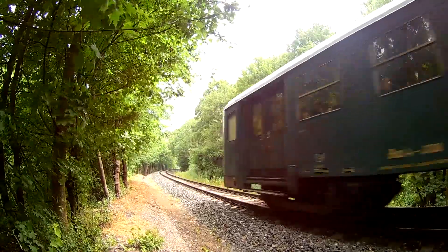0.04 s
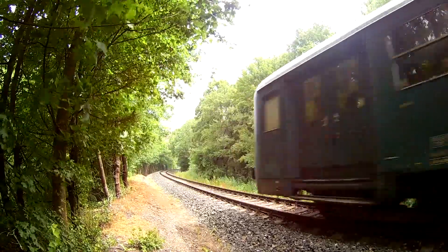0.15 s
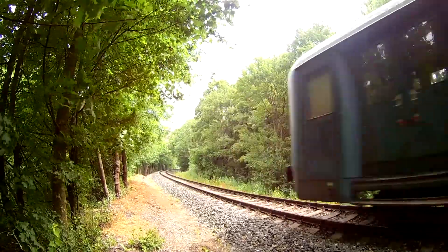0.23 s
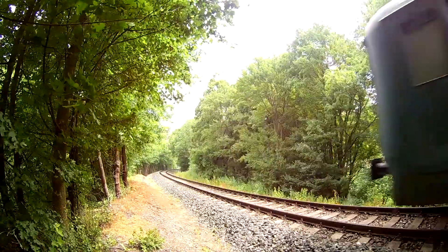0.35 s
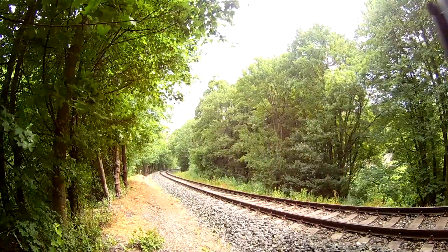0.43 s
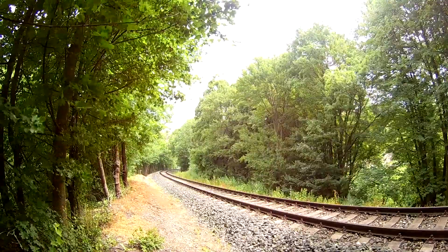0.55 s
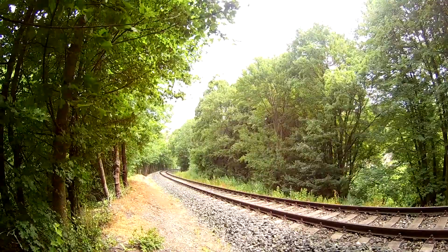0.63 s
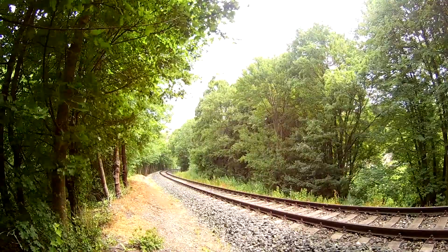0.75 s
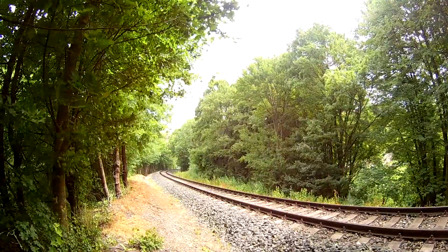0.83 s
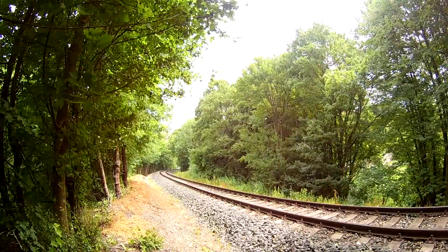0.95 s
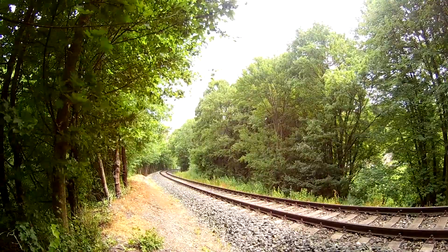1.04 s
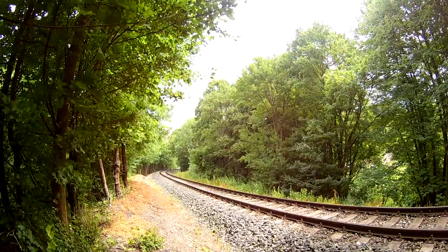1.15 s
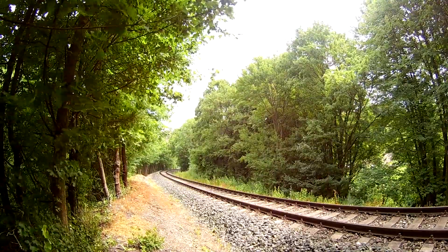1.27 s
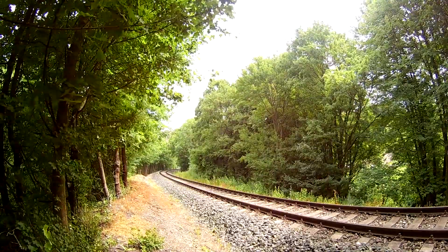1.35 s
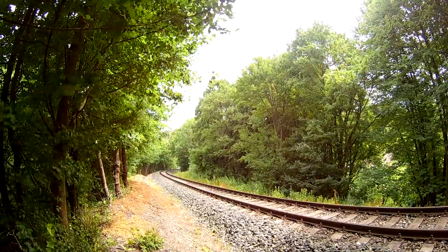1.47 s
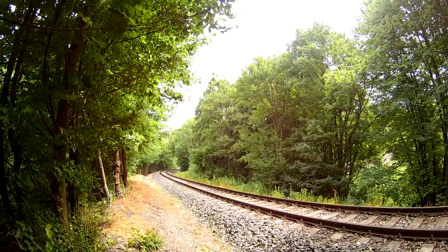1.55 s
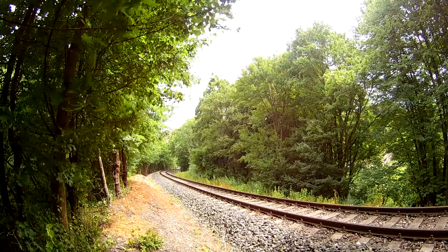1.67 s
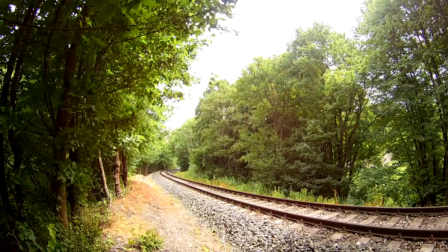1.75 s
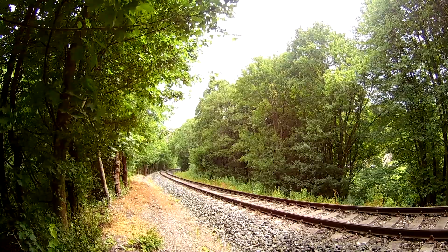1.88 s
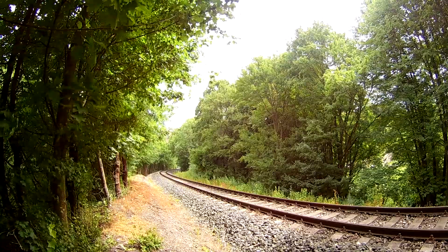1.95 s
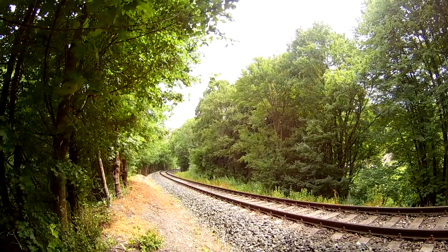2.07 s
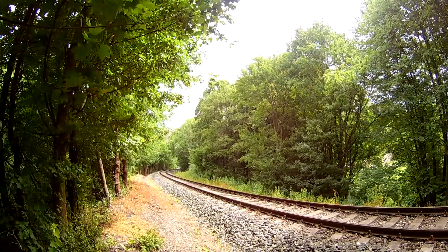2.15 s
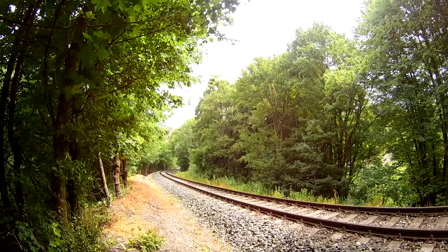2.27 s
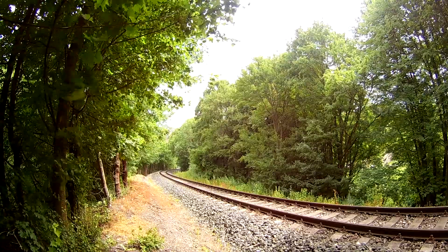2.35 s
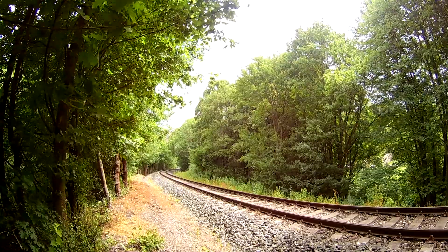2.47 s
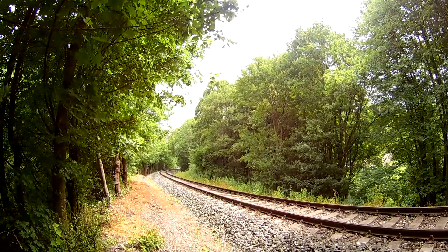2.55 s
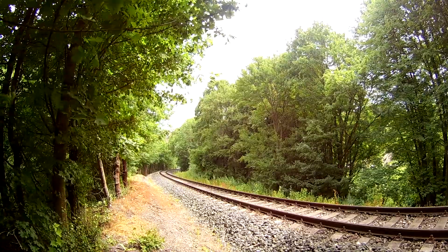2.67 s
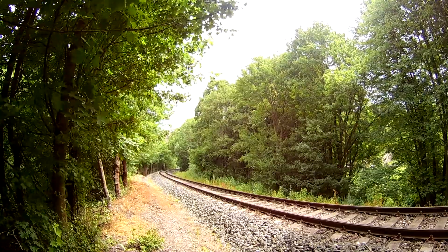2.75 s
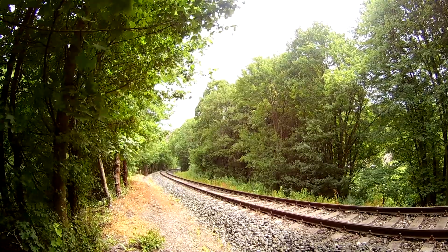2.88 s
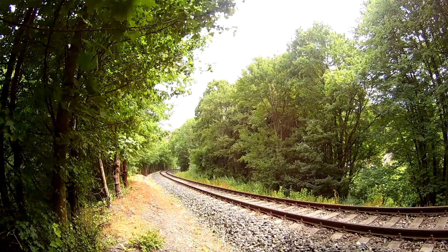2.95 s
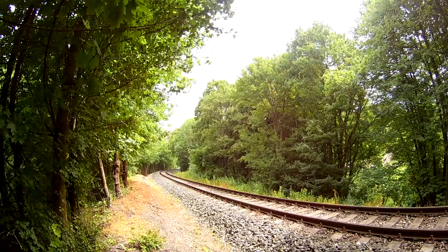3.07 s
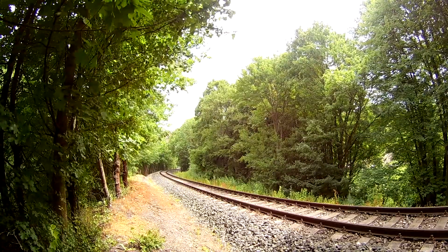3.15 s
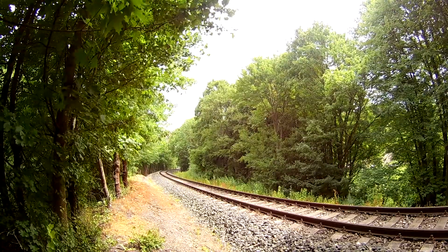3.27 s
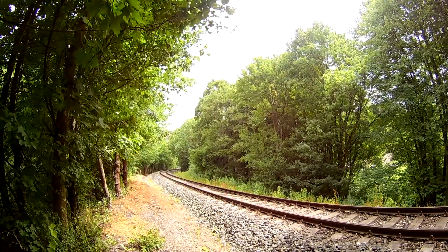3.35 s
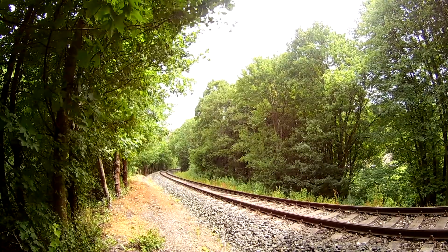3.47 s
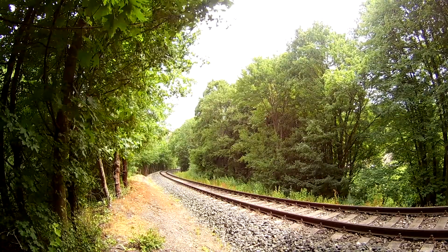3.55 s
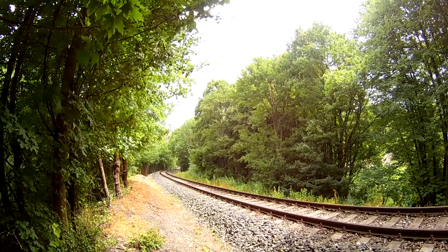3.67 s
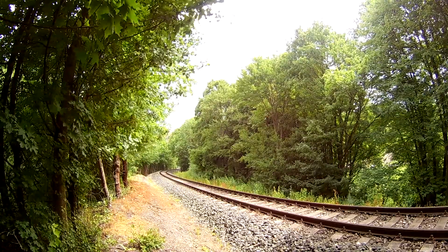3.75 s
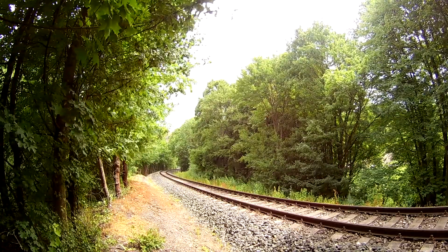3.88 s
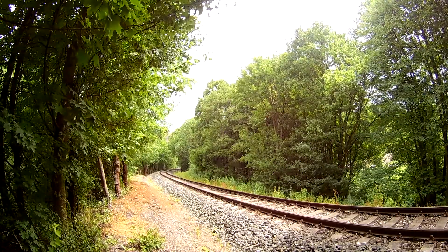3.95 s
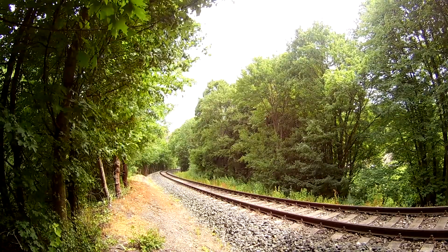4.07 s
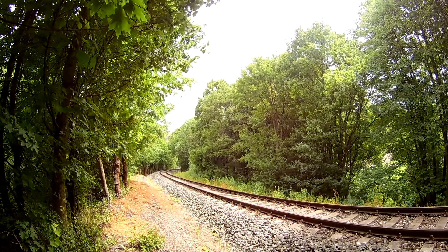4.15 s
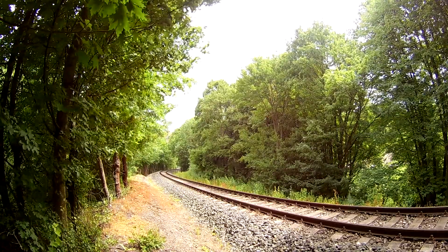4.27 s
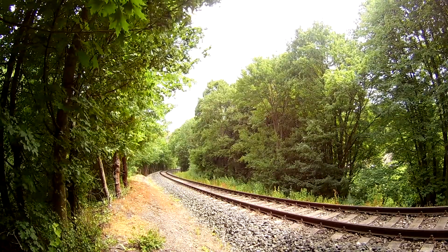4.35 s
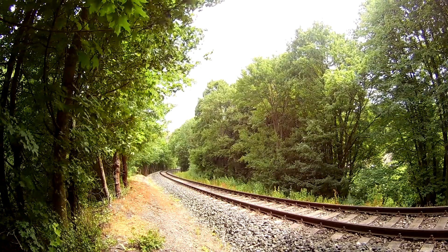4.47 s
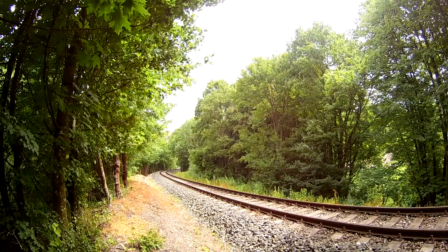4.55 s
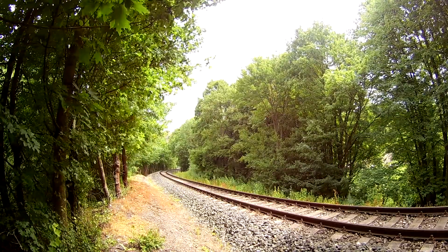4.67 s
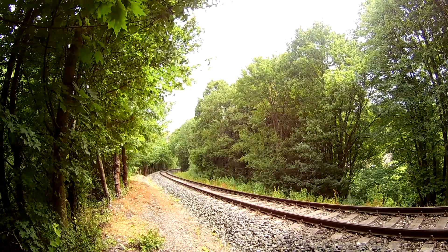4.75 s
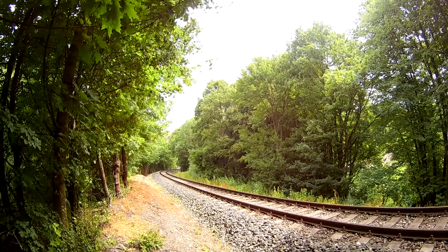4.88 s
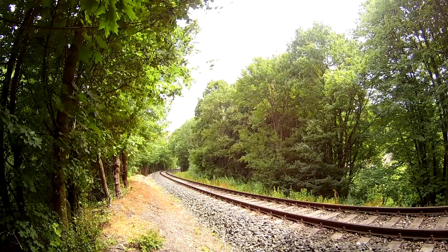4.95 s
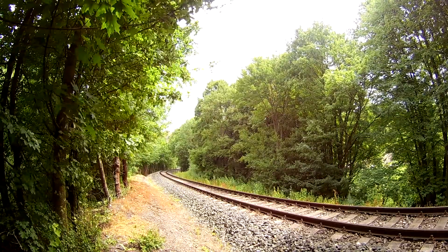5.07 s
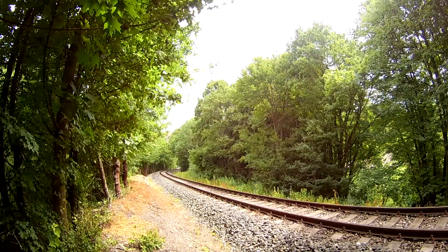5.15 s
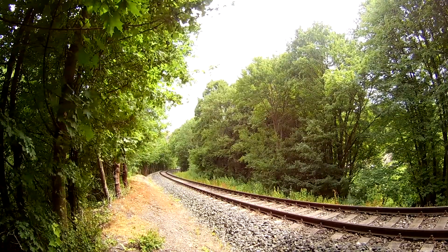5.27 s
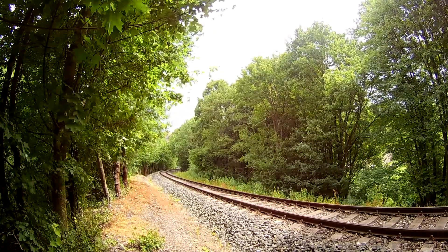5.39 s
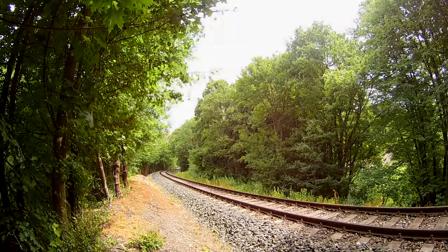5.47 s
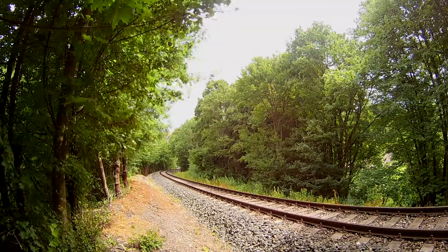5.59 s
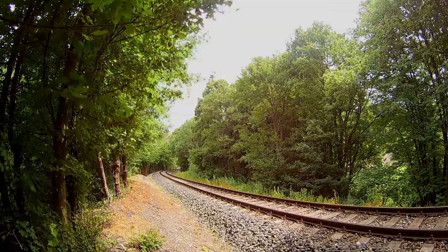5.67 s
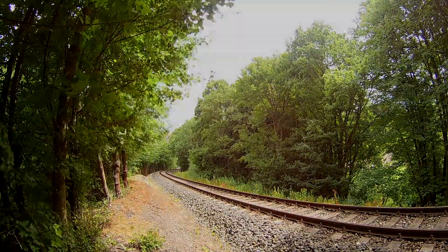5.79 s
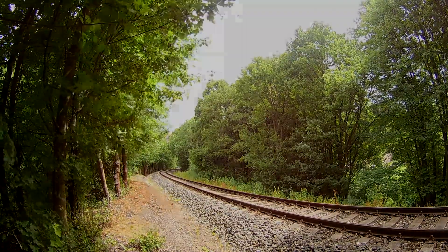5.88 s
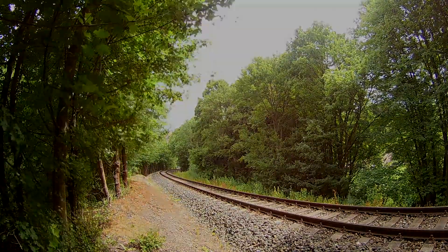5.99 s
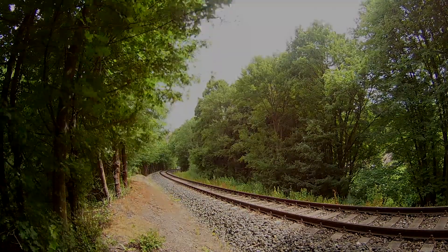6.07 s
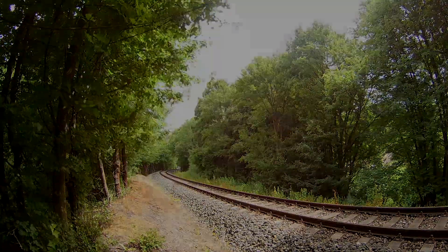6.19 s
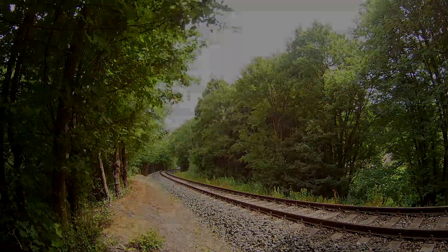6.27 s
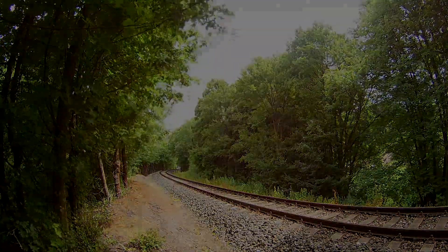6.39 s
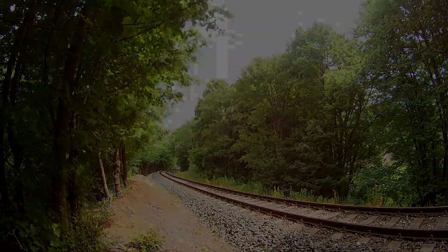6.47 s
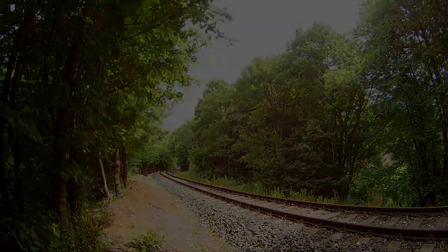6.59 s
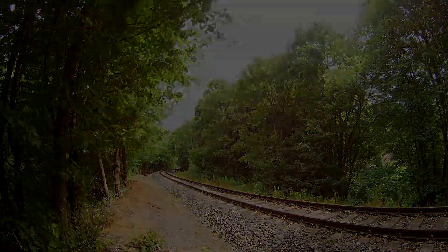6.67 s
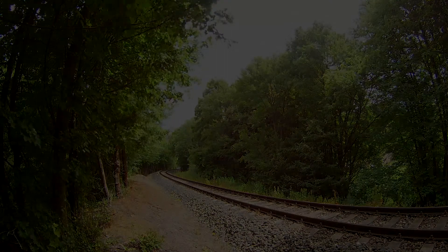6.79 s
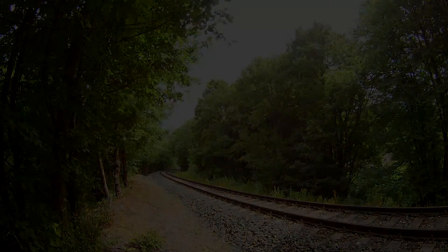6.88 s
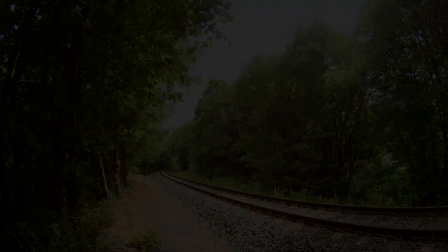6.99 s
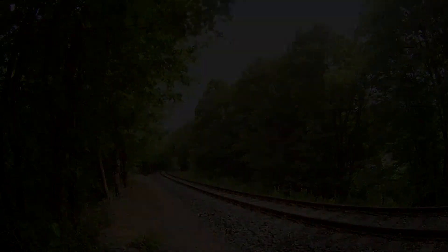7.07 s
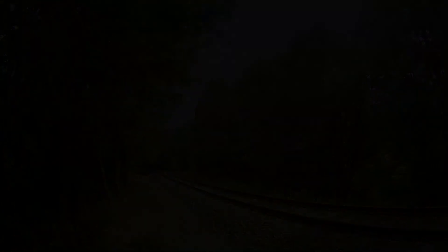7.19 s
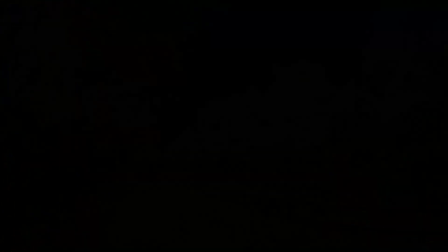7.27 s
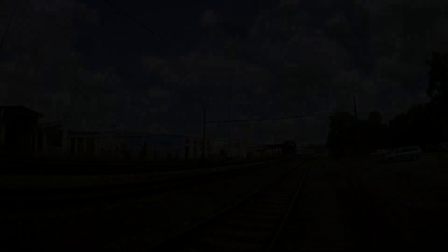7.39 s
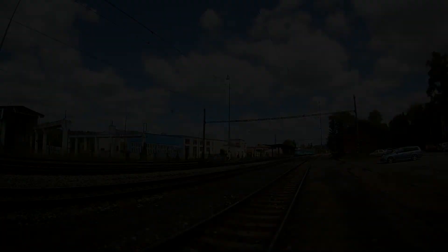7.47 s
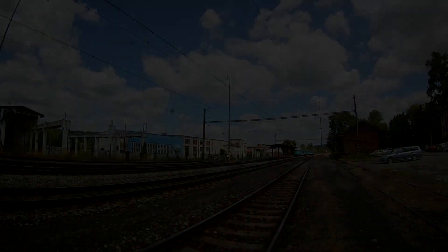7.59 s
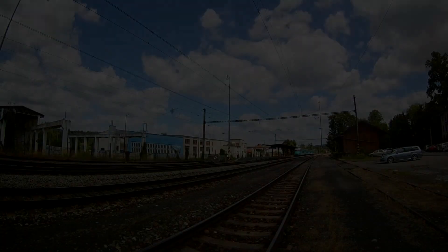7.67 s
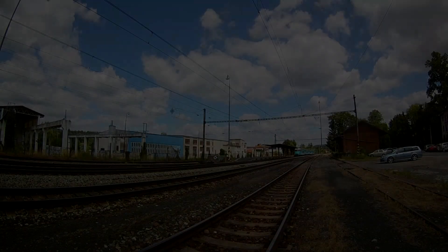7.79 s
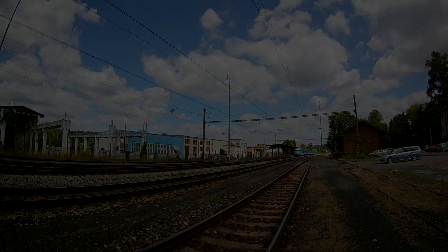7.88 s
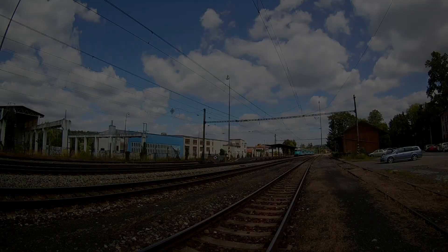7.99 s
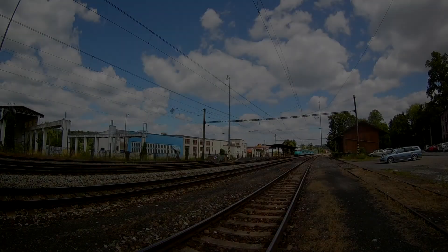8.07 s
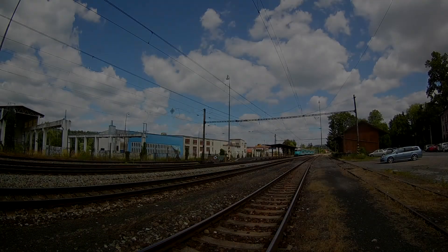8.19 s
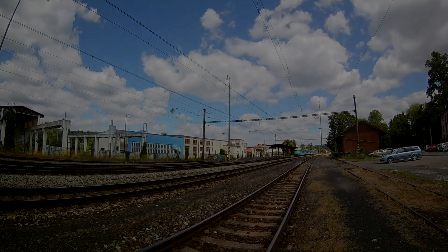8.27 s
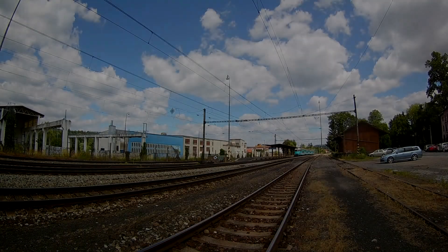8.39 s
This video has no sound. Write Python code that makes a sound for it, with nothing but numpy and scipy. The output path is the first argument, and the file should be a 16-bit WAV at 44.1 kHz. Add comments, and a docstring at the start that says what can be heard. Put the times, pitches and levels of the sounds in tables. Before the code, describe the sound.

Loud low jolts and wheel clatter as a train's tail passes, rolling away into a ringing rail murmur, fading to silence, then faint gusty hum.

```python
"""Beside a wooded railway curve, the last coach of a diesel train rushes past close by and rolls away.
Random tiny blows ring the rails, the coach body and two singing wheel modes; jolts are low sine tones.
The engine drones on wavering harmonics far ahead, and filtered noise makes the slipstream and gusts.
The sound fades out, then fades in on gusts of wind and a dull hum beside another track."""
import sys
import numpy as np
from scipy import signal
from scipy.fft import rfft, irfft
from scipy.io import wavfile
from scipy.ndimage import uniform_filter1d

SR = 44100
rng = np.random.default_rng(int(sys.argv[2]) if len(sys.argv) > 2 else 0)


def persist_wave(psi):
    """Save psi, clipped to +-1, as 16-bit WAV."""
    counts = np.round(np.clip(psi, -1, 1) * 32767).astype(np.int16)
    wavfile.write(sys.argv[1], SR, np.atleast_2d(counts).T)


N = 372204
TIME = np.arange(N) / SR  # s
FREQ = np.maximum(np.fft.rfftfreq(N, 1 / SR), 1)  # Hz, kept above zero for the logarithms
# silence between the two places: start_s, end_s
PAUSE = (7.195, 7.265)


def undb(db):
    """Turn decibels into gain."""
    return 10 ** (np.asarray(db) / 20)


def curves(table):
    """Join the points of each table column into one value a sample."""
    s, *columns = np.transpose(table)
    return [np.interp(TIME, s, column) for column in columns]


def unit(x):
    """Scale to an average strength (rms) of 1."""
    return x / np.sqrt(np.mean(x ** 2))


def shape(x, gain):
    """Filter a sound by one gain for each frequency."""
    return irfft(rfft(x) * gain, N)


def noise():
    """White noise, equally strong at all pitches."""
    return rng.standard_normal(N)


def colour(points):
    """Gain for each frequency from a pitch and level table, falling away outside it."""
    hz, db = np.transpose(points)
    inside = undb(np.interp(np.log(FREQ), np.log(hz), db))
    low_end = np.minimum(FREQ / hz[0], 1) ** 2
    high_end = np.minimum(hz[-1] / FREQ, 1) ** 2
    return inside * low_end * high_end


def bell(hz, width_hz):
    """Resonance curve, 1 at its centre."""
    return 1 / (1 + (2 * (FREQ - hz) / width_hz) ** 2)


def walk(rate_hz):
    """Smooth random wandering with an rms of 1; a higher rate wanders faster."""
    return unit(shape(noise(), np.exp(-(FREQ / rate_hz) ** 2)))


def swell(at_s, spread_s):
    """A smooth bump in time, 1 at its top."""
    return np.exp(-.5 * ((TIME - at_s) / spread_s) ** 2)


def impacts(rate, spread_db):
    """Dense tiny blows of uneven size, about rate of them a second."""
    hit = rng.random(N) < rate / SR
    size = noise() * undb(spread_db * noise())
    return unit(hit * size)


def rattling(gain, rate, spread_db, flutter_db, flutter_hz):
    """Surface roughness strikes a structure; each octave flutters on its own."""
    spectrum = rfft(impacts(rate, spread_db)) * gain
    octave = np.clip(np.log2(FREQ / 250), 0, 4)
    out = 0
    for k in range(5):
        overlap = np.maximum(1 - abs(octave - k), 0)
        band = irfft(spectrum * overlap, N)
        out = out + band * undb(flutter_db * walk(flutter_hz))
    return unit(out)


# the last bogie: moment of passing (s), speed (m/s), distance of the track (m)
PASS_S, SPEED_M_S, TRACK_M = 0.16, 14, 2.15


def receding(level_db, spread_db, loss_db_per_m):
    """Gain as the train goes: level at the pass, loss per tenfold distance, loss per metre of woods."""
    metres = np.hypot(TRACK_M, SPEED_M_S * (TIME - PASS_S))
    spreading_db = spread_db * np.log10(metres / TRACK_M)
    woods_db = loss_db_per_m * (metres - TRACK_M)
    return undb(level_db - spreading_db - woods_db)


# the wheels rub sideways in the curve:
# middle_s, spread_s, rolling_lift_db, low_mode_lift_db, high_mode_lift_db
WHEEL_RUBS = [(1.45, 0.27, 1, -6, 6), (2.66, 0.28, 1.1, 5.5, 6.5), (3.45, 0.21, -0.5, 7.5, 9.5),
              (4.953, 0.14, 1.8, 3, -2)]


def rubbing():
    """Gains by which sideways rubs lift or lower the rolling, the low mode and the high mode."""
    return undb(sum(np.outer(lifts_db, swell(at, spread)) for at, spread, *lifts_db in WHEEL_RUBS))


# resonances that lift the rolling sound: pitch_hz, width_hz, lift_db
WHEEL_RESONANCES = [(405, 35, 2), (480, 110, 0.5), (548, 25, -0.5), (650, 30, -2.5), (707, 45, 2),
                    (1090, 35, 3.5), (1327, 37, 7.5), (1750, 70, 3.5), (1892, 33, 6.5)]
# tone of the rolling before those lifts: pitch_hz, relative_level_db
RAIL_TONE = [(100, -16), (230, -7), (320, -14), (420, -3.5), (680, -4), (870, -1.5), (1080, -10.5),
             (1560, -17.5), (1780, -18), (2250, -20.5), (2950, -42), (4000, -38.5), (5500, -51.5),
             (8000, -70)]


def rails():
    """Rolling wheels ring the rails and themselves; the rails carry the sound, so it recedes slowly."""
    lift_db = sum(db * bell(hz, width) for hz, width, db in WHEEL_RESONANCES)
    gain = colour(RAIL_TONE) * undb(lift_db)
    roll = rattling(gain, rate=6000, spread_db=0, flutter_db=1.42, flutter_hz=14)
    rolling_lift = rubbing()[0]
    return roll * receding(level_db=-23, spread_db=2.63, loss_db_per_m=0.14) * rolling_lift


# jolts of the bogie: start_s, peak_db, pitch_hz
BOGIE_JOLTS = [(.005, -5.5, 167.7), (.075, 0, 179.4), (.212, -2.5, 138.3), (.445, -12.5, 141),
               (.58, -12, 152)]
JOLT_RISE_S = 0.016  # time from the start of a jolt to its peak


def jolt_envelope(at_s):
    """A quick swell to 1 and a longer decay."""
    age = np.maximum(TIME - at_s, 0) / JOLT_RISE_S
    return age * np.exp(1 - age)


def jolt_strength():
    """Combined strength of all the jolts, which also stir up the boom and the clatter."""
    return sum(undb(db) * jolt_envelope(at) for at, db, hz in BOGIE_JOLTS)


def jolts():
    """Each jolt swells into a low ring of the coach body and dies away."""
    out = 0
    for at, db, hz in BOGIE_JOLTS:
        ring = np.sin(2 * np.pi * hz * (TIME - at))
        out = out + undb(db) * jolt_envelope(at) * ring
    return out


# resonances of the coach body: pitch_hz, width_hz, relative_level_db
COACH_RESONANCES = [(136, 17, -1), (201, 74, 0), (211, 52, -7.5)]
# from this time (s) the boom dies away faster (dB/s); a jolt shakes the body too (dB re the jolt)
BOOM_END_S, BOOM_RELEASE_DB_S, JOLT_SHAKE_DB = 1.36, 91, -3


def coach_boom():
    """The near wheels shake the coach body, which booms at its resonances; jolts shake it further."""
    body = sum(undb(db) * bell(hz, width) for hz, width, db in COACH_RESONANCES)
    boom = unit(shape(impacts(rate=760, spread_db=2), body))
    release = undb(-BOOM_RELEASE_DB_S * np.maximum(TIME - BOOM_END_S, 0))
    rolling = receding(level_db=-16, spread_db=5.1, loss_db_per_m=0.053) * release
    return boom * np.hypot(rolling, undb(JOLT_SHAKE_DB) * jolt_strength())  # powers add


# tone of the sleeper clatter: pitch_hz, relative_level_db
CLATTER_TONE = [(110, -25.5), (260, 3), (400, 3.5), (560, 1), (820, -2), (930, -9.5), (1130, -6.5),
                (1500, -28), (2200, -35.5), (3500, -57)]
# the coach end moves in front of its bogie: middle (s), half-length (s), drop (dB)
SCREEN_S, SCREEN_WIDTH_S, SCREEN_DB = 0.95, 0.091, -6
JOLT_CLATTER_DB = -10  # clatter stirred by a jolt, re the jolt


def sleeper_clatter():
    """The near wheels clatter the sleepers until the coach end partly screens them; jolts add more."""
    clatter = rattling(colour(CLATTER_TONE), rate=3500, spread_db=0.5, flutter_db=1.7, flutter_hz=25.77)
    covered = (1 + np.tanh((TIME - SCREEN_S) / SCREEN_WIDTH_S)) / 2  # from 0 to 1
    rolling = receding(level_db=-12.5, spread_db=5, loss_db_per_m=0.48) * undb(SCREEN_DB * covered)
    return clatter * np.hypot(rolling, undb(JOLT_CLATTER_DB) * jolt_strength())


# tone of the wheel hiss: pitch_hz, relative_level_db
HISS_TONE = [(700, -5.5), (1300, 3.5), (1650, -3.5), (2050, 1.5), (2650, -12.5), (3000, -20), (4100, -16.5),
             (5500, -24.5), (6900, -35.5), (7900, -48.5), (10000, -45), (15000, -55)]


def wheel_hiss():
    """Wheels hiss on the rail head, a little louder for a moment near the pass."""
    hiss = rattling(colour(HISS_TONE), rate=7000, spread_db=1.5, flutter_db=1.3, flutter_hz=30)
    lift = undb(3.5 * swell(at_s=0.18, spread_s=0.05))
    return hiss * receding(level_db=-24.5, spread_db=18.8, loss_db_per_m=0.21) * lift


# tone of the flange scrape: pitch_hz, relative_level_db
SCRAPE_TONE = [(1500, -10.5), (2400, 3), (3000, -14.5), (4300, -3.5), (6800, -12), (7900, -29.5),
               (10000, -16.5), (12500, -27), (15000, -30)]
# thin whistle of a flange in the curve: pitch_hz, width_hz, relative_level_db
WHISTLE_RESONANCES = [(9560, 100, -3), (10480, 130, 5.5), (14100, 220, -4)]


def flange():
    """A flange scrapes the rail as it passes, then whistles faintly."""
    scrape = unit(shape(noise(), colour(SCRAPE_TONE))) * swell(at_s=0.13, spread_s=0.013)
    modes = sum(undb(db) * bell(hz, width) for hz, width, db in WHISTLE_RESONANCES)
    whistle = unit(shape(noise(), modes)) * swell(at_s=0.55, spread_s=0.12)
    return undb(-37.5) * scrape + undb(-67.5) * whistle


# the two singing modes: pitch_hz, width_hz
LOW_MODE, HIGH_MODE = (595, 30), (855, 160)
# how each recedes: level at the pass (dB), loss per tenfold distance (dB), loss in the woods (dB/m)
LOW_MODE_FADE, HIGH_MODE_FADE = (-44.5, 0, .06), (-35.5, 1, .19)
MODE_DRIFT = .014  # slow wander of the singing pitch (share)


def singing():
    """The curve rubs the wheels sideways, so two of their modes swell, sink and wander in pitch."""
    modes, fades = (LOW_MODE, HIGH_MODE), (LOW_MODE_FADE, HIGH_MODE_FADE)
    out = 0
    for mode, fade, rub in zip(modes, fades, rubbing()[1:]):
        ring = unit(shape(impacts(rate=900, spread_db=4), bell(*mode)))
        # reading the sound slightly faster or slower bends its pitch
        reading_s = np.cumsum(1 + MODE_DRIFT * walk(3)) / SR
        ring = np.interp(reading_s, TIME, ring)
        out = out + ring * receding(*fade) * rub * undb(2.6 * walk(19))
    return out


# engine harmonics: multiple_of_firing_rate, level_db (middle of its wavering)
ENGINE_HARMONICS = [(1, -46), (2, -50.5), (3, -46), (4, -45)]
ENGINE_HZ = 32.53  # middle of the wavering firing rate


def engine():
    """Far ahead the diesel drones on a few low harmonics that waver on their way through the trees."""
    firing_hz = ENGINE_HZ * (1 + .006 * walk(7))
    phase = 2 * np.pi * np.cumsum(firing_hz) / SR
    out = 0
    for multiple, db in ENGINE_HARMONICS:
        level = np.sqrt(2) * undb(db + 2.9 * walk(1.9))  # root 2 turns rms into peak
        out = out + level * np.sin(multiple * phase)
    return out


# dry knocks and ticks: start_s, peak_db, centre_hz, ring_s
KNOCKS = [(.042, -10, 600, 0.028), (.207, -1.5, 556, 0.011), (.762, -11, 800, 0.016),
          (.845, -17, 1195, 0.029), (2.523, -15, 624, 0.028), (4.964, -37.5, 3710, .0008),
          (7.374, -37, 652, .0037), (7.438, -43, 1600, 0.0016), (7.482, -31, 620, 0.0027),
          (7.614, -43, 1300, .003), (7.954, -27, 596, 0.0031), (7.958, -41, 1250, .004),
          (8.188, -30, 534, 0.0062), (8.208, -44, 1200, 0.0039), (8.319, -34, 790, .0036),
          (8.398, -31, 900, 0.0062)]
TICK_SPREAD = 0.18  # breadth of a tick's spectrum (squared log ratio)


def ticks():
    """Each knock or tick is a short noise burst that dies away around its own pitch."""
    out = 0
    for at, db, hz, ring_s in KNOCKS:
        burst = noise() * (TIME >= at) * np.exp(-abs(TIME - at) / ring_s)
        click = shape(burst, np.exp(-np.log(FREQ / hz) ** 2 / TICK_SPREAD))
        out = out + undb(db) * click / abs(click).max()
    return out


# gusts on the microphone: middle_s, spread_s, level_db, eddy_corner_hz
WIND_GUSTS = [(0.777, 0.056, -24, 130), (2.162, 0.14, -26.5, 233), (2.808, 0.3, -32, 170),
              (6.21, 0.15, -35.5, 159), (6.657, 0.081, -37, 245), (7, 0.032, -29, 155),
              (7.784, 0.034, -44.5, 239), (8.034, 0.11, -36, 125), (8.226, 0.053, -32, 250),
              (8.446, 0.07, -29, 244)]
# slipstream: level (dB), held until (s), then dying away (dB/s)
WAKE_DB, WAKE_HOLD_S, WAKE_RELEASE_DB_S = -32, 2.65, 7
BREEZE_DB, CALM_EDDY_HZ = -43, 145  # steady breeze; eddy corner of breeze and slipstream


def airflow():
    """Strength and eddy corner of the wind: slipstream, breeze and gusts add in power."""
    wake_db = WAKE_DB - WAKE_RELEASE_DB_S * np.maximum(TIME - WAKE_HOLD_S, 0)
    flows = [(undb(wake_db) ** 2 + undb(BREEZE_DB) ** 2, CALM_EDDY_HZ)]
    for at, spread, db, hz in WIND_GUSTS:
        flows.append(((undb(db) * swell(at, spread)) ** 2, hz))
    total = sum(power for power, hz in flows)
    corner_hz = sum(power * hz for power, hz in flows) / total  # the strongest flow counts most
    return np.sqrt(total), corner_hz


def wind():
    """Turbulence on the microphone: noise bands fade above the eddy corner and come in bursts."""
    strength, corner_hz = airflow()
    bursts = walk(19)
    out = 0
    for hz in 25 * 2 ** (np.arange(13) / 2):  # half-octave steps
        overlap = np.maximum(1 - abs(2 * np.log2(FREQ / hz)), 0) ** .5
        band = unit(shape(noise(), overlap))
        power = hz / 120 / (1 + (hz / corner_hz) ** 4.84)
        burst_db = 2.2 * min(hz / 200, 1) * bursts  # weaker in the lowest bands
        out = out + band * np.sqrt(power) * undb(burst_db + 0.52 * walk(3))
    return out * strength


# single eddies that strike the microphone: middle_s, peak_db (approximate), pitch_hz
EDDIES = [(1.976, -12, 209), (2.057, -12.5, 370), (2.355, -11.5, 169), (3.132, -15.5, 148),
          (6.127, -21, 146), (6.183, -21, 170), (6.295, -19.5, 170), (7.978, -30, 322), (8.191, -18, 199),
          (8.214, -30, 217), (8.39, -19.5, 238)]


def buffets():
    """A single eddy is one quick swing of pressure."""
    out = 0
    for at, db, hz in EDDIES:
        swing = 2 * np.pi * hz * (TIME - at)
        out = out - undb(db) * 3 * swing / (1 + swing ** 2) ** 2  # 3 brings the peak close to 1
    return out


def leaves():
    """Leaves stir briefly in the wake of the train, as a faint band of noise."""
    rustle = unit(shape(noise(), bell(4000, 700) ** 2))
    return undb(-72) * rustle * swell(at_s=6.6, spread_s=.07)


# distant open-air hum beside the other track: pitch_hz, relative_level_db
OPEN_AIR_TONE = [(70, 9.5), (140, -12), (250, 0.5), (500, -13.5), (1000, -23.5), (1500, -28.5), (2200, -29),
                 (3000, -43), (4200, -40), (6500, -51)]


def open_air():
    """Far-off activity merges into a dull, gently moving hum of filtered noise."""
    return unit(shape(noise(), colour(OPEN_AIR_TONE))) * undb(-43.5 + 0.99 * walk(3.9))


def scene():
    """The train fills the first place and the hum the second; ticks, wind and hiss lie over both."""
    bogie = coach_boom() + sleeper_clatter() + wheel_hiss()
    train = rails() + singing() + bogie + jolts() + flange() + engine() + leaves()
    place = np.where(TIME < PAUSE[1], train, open_air())
    microphone_hiss = undb(-76) * noise()
    return (place + ticks() + wind() + buffets() + microphone_hiss)[None]


# volume fader: time_s, gain (0 to 1)
FADER_MOVES = [(5.25, 0.98), (7.19, 0.04), (7.27, 0.023), (8.7, 0.74)]
TOP_HZ = 15700  # pitches above this are cut


def record(dry):
    """The loudest peaks are rounded off, the fader closes and reopens, and the top is cut."""
    rounded = dry / (1 + dry ** 8) ** (1 / 8)
    fader, = curves(FADER_MOVES)
    is_open = (TIME < PAUSE[0]) | (TIME > PAUSE[1])
    fader = uniform_filter1d(fader * is_open, size=256)  # softens the edges of the silence
    top_cut = signal.ellip(8, .2, 70, TOP_HZ, fs=SR, output="sos")
    return signal.sosfilt(top_cut, rounded * fader)


dry = scene()
out = record(dry)
persist_wave(out)
```